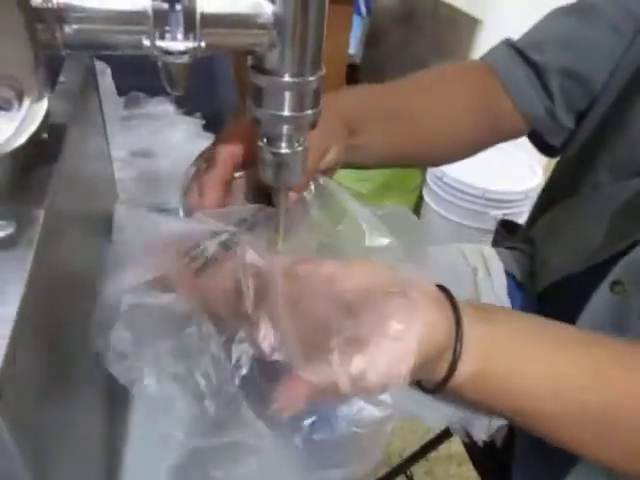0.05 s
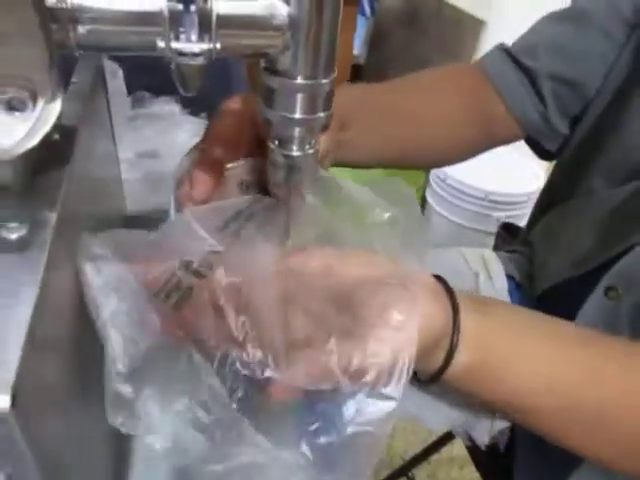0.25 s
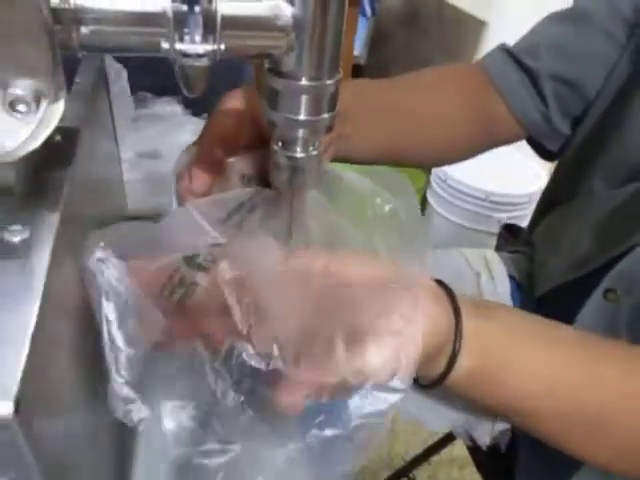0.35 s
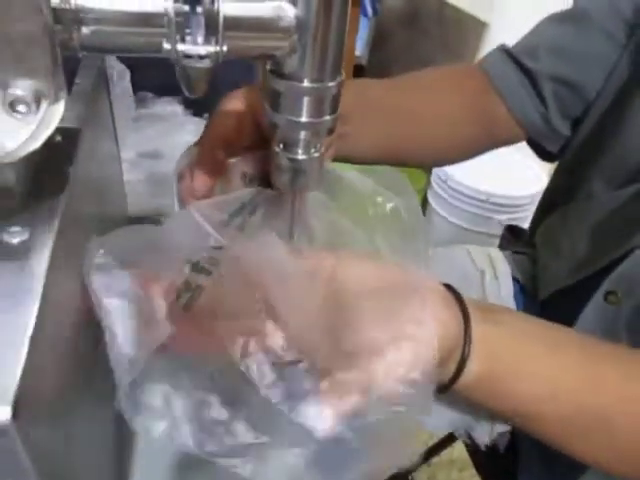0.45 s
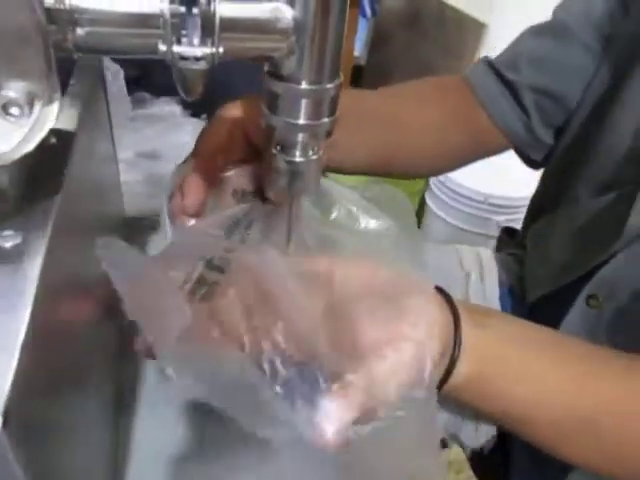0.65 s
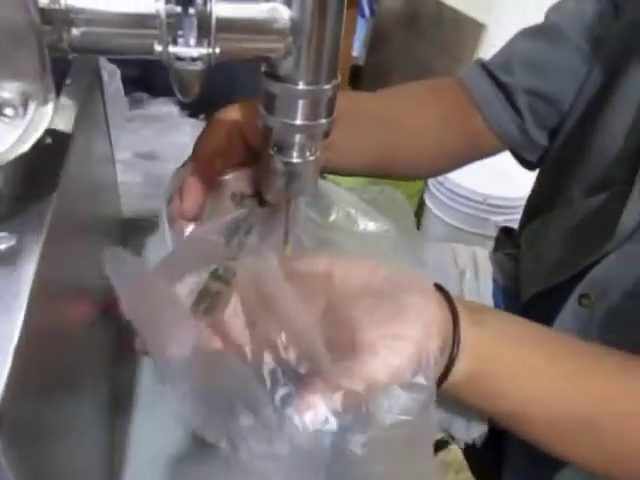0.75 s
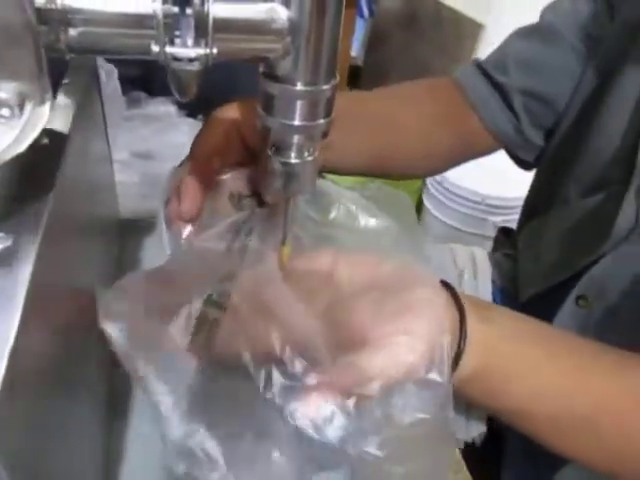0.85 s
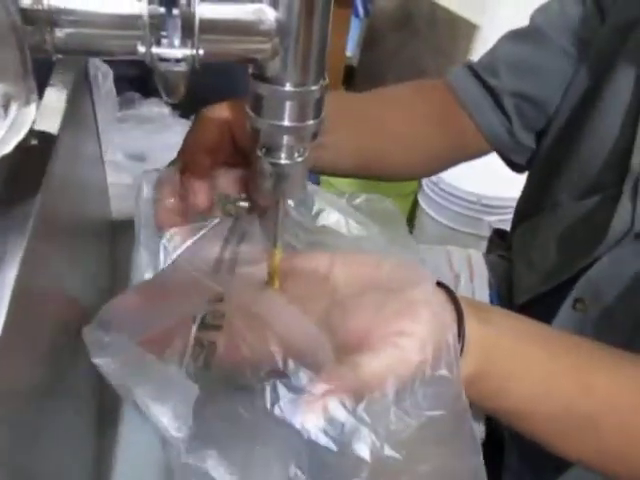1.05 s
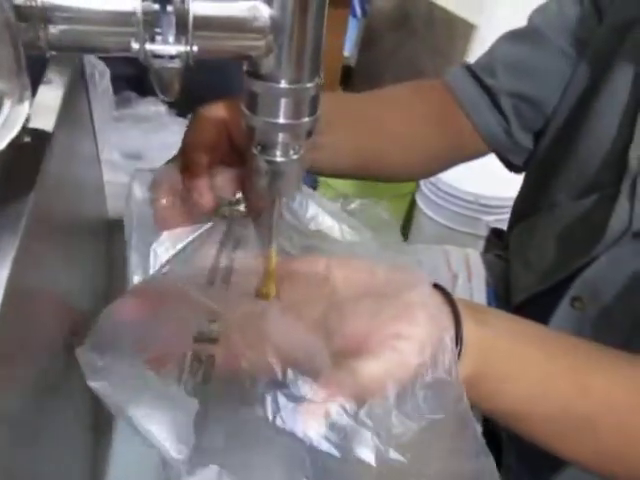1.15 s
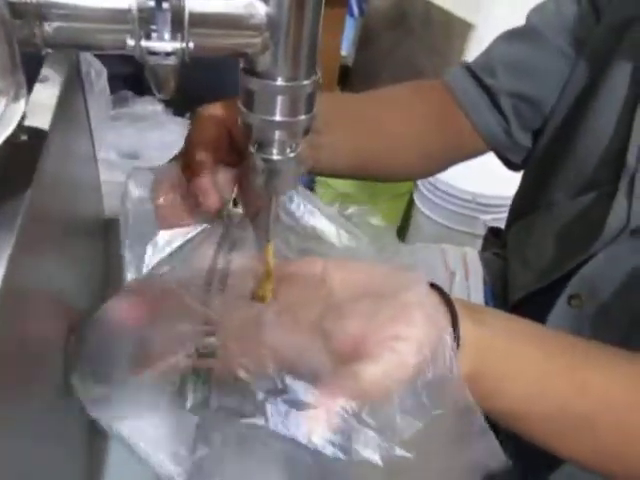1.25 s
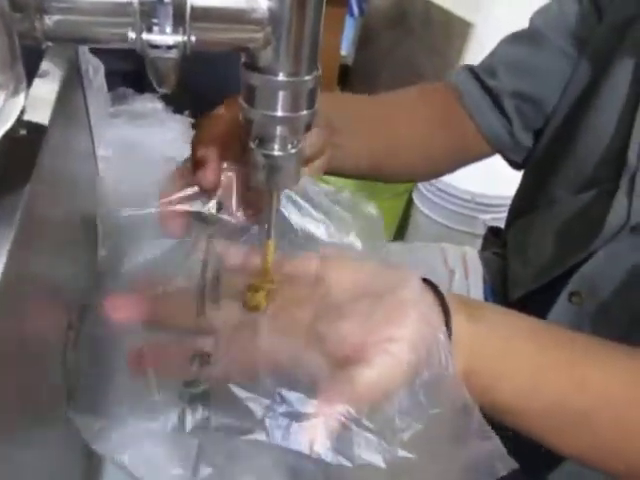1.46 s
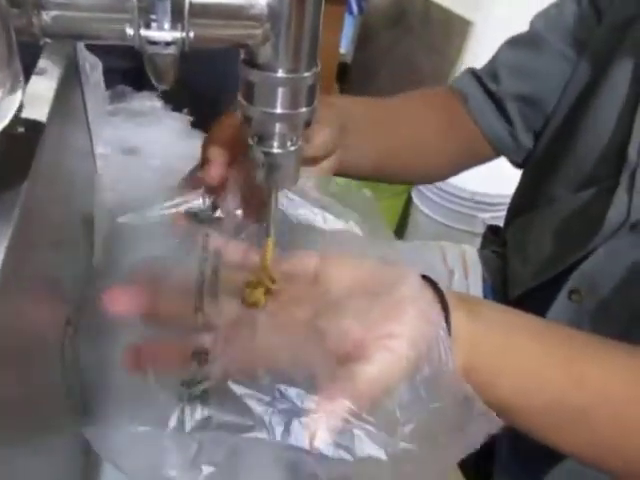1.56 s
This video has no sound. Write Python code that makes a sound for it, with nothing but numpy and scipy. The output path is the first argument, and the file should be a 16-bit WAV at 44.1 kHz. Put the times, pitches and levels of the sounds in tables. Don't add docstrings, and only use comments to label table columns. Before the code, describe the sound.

A single sharp air-piston clack and nozzle knock, followed by swelling air hiss and faint bag rustle

```python
import sys
import numpy as np
from scipy import signal
from scipy.fft import rfft, irfft
from scipy.io import wavfile
from scipy.ndimage import uniform_filter1d

SR = 44100
rng = np.random.default_rng(int(sys.argv[2]) if len(sys.argv) > 2 else 0)


def persist_wave(psi):
    counts = np.round(np.clip(psi, -1, 1) * 32767).astype(np.int16)
    wavfile.write(sys.argv[1], SR, np.atleast_2d(counts).T)


def volts_from_db(level):
    exponent = np.asarray(level, float) / 20
    return 10 ** exponent


N = 70560
T = np.arange(N) / SR


def evened(x):
    return x / np.sqrt(np.mean(x ** 2) + 1e-20)


def read(points, hz):
    f, value = np.transpose(points)
    return np.interp(np.log(hz + 1), np.log(f + 1), value)


def bumps(rows, hz):
    return sum(db * np.exp(-((hz - f) / width_hz) ** 2) for f, width_hz, db in rows)


def curve(rows, column=1):
    rows = np.array(rows)
    return np.interp(T, rows[:, 0], rows[:, column])


def noise(colour, patchy_db, flicker_db, boosts=((1, 1, 0),), size=512):
    frames, hz = 4 * N // size + 5, np.fft.rfftfreq(size, 1 / SR)
    real, imag, patch = rng.standard_normal((frames, len(hz), 3)).T
    patch = uniform_filter1d(patch, size=8, axis=0)
    patch = evened(uniform_filter1d(patch, size=10, axis=1))
    flicker = evened(uniform_filter1d(rng.standard_normal(frames), size=2))
    outside = (hz < colour[0][0] * .7) | (hz > colour[-1][0] * 1.3)
    colour_db = read(colour, hz) + bumps(boosts, hz) - 60 * outside
    gain = volts_from_db(colour_db[:, None] + patchy_db * patch + flicker_db * flicker)
    z = (real + 1j * imag) * gain
    return evened(signal.istft(z, nperseg=size, noverlap=3 * size // 4)[1][:N])


def ring(modes, start_s, db=0):
    t = np.maximum(T - start_s, 0)
    return sum(volts_from_db(db + level_db - 60 * t / t60_s) * np.sin(2 * np.pi * hz * t)
               for hz, level_db, t60_s in modes)


def bursts(rows):
    out = np.zeros(N)
    for centre_s, peak_db, hz, length_ms in rows:
        t = T - centre_s
        bell = np.exp(-(t / (length_ms / 1000)) ** 2)
        out += volts_from_db(peak_db) * bell * np.sin(2 * np.pi * hz * t)
    return out


# pitch_hz, level_db, t60_s
VALVE_MODES = [(890, 1, 0.037), (1180, -4.5, 0.028), (1340, -1.5, 0.024), (1780, -6, 0.069)]
# start_s, level_db
VALVE_TICKS = [
    (0.194, -46),
    (0.2022, -37.5),
    (0.2094, -31),
    (0.2106, -25.5),
    (0.2137, -33.5),
    (0.2188, -35.5),
    (.283, -31),
]
# centre_s, peak_db, pitch_hz, length_ms
SLAMS = [
    (.2253, -19, 7600, .3),
    (.2265, 1, 7900, .4),
    (.2266, -16, 13000, .5),
    (.2284, -9, 8200, .5),
    (.2305, -14, 8000, .8),
    (.231, -18, 3500, .8),
    (.2345, -17, 7000, .8),
]
# pitch_hz, level_db, t60_s
CYLINDER_MODES = [(1320, -27, 0.017), (1910, -17, 0.037), (3590, -23, 0.031), (6410, -20.5, 0.055),
                  (7300, -43, 0.034), (7240, -34, .05), (8800, -12, 0.021), (13000, -31, 0.0083)]
CYLINDER_START_S = .2272


def piston():
    ticks = sum(ring(VALVE_MODES, start_s, db) for start_s, db in VALVE_TICKS)
    return bursts(SLAMS) + ring(CYLINDER_MODES, CYLINDER_START_S) + ticks


# start_s, pitch_hz, length_s, rise_s
STOP = (.2283, 221, .0085, .0008)
STOP_DB = -0.5
# centre_s, peak_db, pitch_hz, length_ms
JOLTS = [(.231, -52, 39, 5.2), (.328, -31, 115, 7.8), (.232, -20.5, 660, 3.4), (.231, -23, 516, 2.3),
         (.232, -29.5, 460, 3.5), (0.21, -26.5, 1050, 3), (.2515, -18.5, 214, 5.2), (.287, -25, 255, 3.3),
         (.3005, -19.5, 290, 1.8), (0.3, -18, 230, 4), (.356, -21, 208, 20), (.3805, -18, 231, 3.4),
         (0.46, -33, 250, 0.94), (.4465, -27, 270, 2.3)]
# centre_s, peak_db, pitch_hz, length_ms
LATE_KNOCKS = [
    (.70, -44, 460, 7.4),
    (.697, -46, 637, 3.1),
    (1.59, -49.5, 980, 8),
    (1.588, -45, 3570, 4),
    (1.592, -48, 2900, 4),
]
# pitch_hz, level_db, t60_s
FRAME_MODES = [(157, -27, 0.33), (203, -28, 0.38), (236.3, -29.5, 0.67), (287.3, -33.5, 0.86),
               (379, -33.5, 0.2), (421, -41, 0.66)]
# pitch_hz, level_db, t60_s
NOZZLE_FRAME_MODES = [(207, -31, 1), (615, -32, 0.24), (419, -38, 0.59)]


def frame():
    start_s, hz, length_s, rise_s = STOP
    t = np.maximum(T - start_s, 0)
    envelope = np.exp(-(t / length_s) ** 4) * (1 - np.exp(-t / rise_s))
    stop = volts_from_db(STOP_DB) * np.sin(2 * np.pi * hz * t) * envelope
    hum = ring(FRAME_MODES, start_s + length_s) + ring(NOZZLE_FRAME_MODES, KNOCKS[-1][0])
    out = stop + bursts(JOLTS + LATE_KNOCKS) + hum
    return signal.sosfiltfilt(signal.butter(2, 30, "high", fs=SR, output="sos"), out)


# freq_hz, level_db
EXHAUST_COLOUR = [(290, -46), (500, 1.5), (1030, -7), (1180, 0), (2360, -2.5), (4660, -10), (6800, -6),
                  (10200, -10.5), (16000, -26)]
# start_s, low_db, bright_db, rise_s, t60_s
PUFFS = [
    (0.2088, -31.5, -41, 0.00087, 0.49),
    (0.2241, -16, -10, 0.0016, 0.04),
    (0.228, -33, -25, 0.0044, 0.51),
    (0.3218, -18.5, -21, 0.00062, 0.028),
    (0.377, -35.5, -28, 0.0016, 0.076),
    (0.384, -51, -37, 0.0054, 0.035),
    (.33, -40, -50, 0.021, 0.78),
    (0.689, -47.5, -59, 0.0021, 0.27),
]
SPLIT_HZ = 6400


def exhaust():
    hiss = noise(EXHAUST_COLOUR, patchy_db=0.43, flicker_db=1.1, size=256)
    low = signal.sosfiltfilt(signal.butter(4, SPLIT_HZ, fs=SR, output="sos"), hiss)
    bright = hiss - low
    out = np.zeros(N)
    for start_s, low_db, bright_db, rise_s, t60_s in PUFFS:
        t = np.maximum(T - start_s, 0)
        envelope = volts_from_db(-60 * t / t60_s) * np.minimum(t / rise_s, 1)
        out += envelope * (volts_from_db(low_db) * low + volts_from_db(bright_db) * bright)
    return out


# start_s, level_db
KNOCKS = [
    (.3211, -15),
    (.3223, -15),
    (.3230, -19),
    (.3245, -23),
    (.3287, -26),
]
# pitch_hz, level_db, t60_s
NOZZLE_MODES = [(553, -9, 0.035), (896, -8.5, 0.015), (1240, -8.5, .016), (1430, -0.5, 0.016),
                (2620, -2, 0.013), (3210, -10, 0.0066), (6280, -8, 0.018), (8000, -7, 0.012),
                (11000, -16, 0.0091), (13800, -28, 0.0087)]
# centre_s, peak_db, pitch_hz, length_ms
CRACKS = [
    (.3214, -9, 3000, .12),
    (.3225, -11, 4000, .12),
    (.3232, -11, 4000, .12),
    (.3247, -14, 3000, .15),
]


def nozzle():
    out = np.zeros(N)
    for start_s, db in KNOCKS:
        modes = [(hz * rng.uniform(0.95, 1.01), level_db, t60_s) for hz, level_db, t60_s in NOZZLE_MODES]
        out += ring(modes, start_s, db)
    out = signal.sosfilt(signal.butter(2, 300, "high", fs=SR, output="sos"), out)
    return out + bursts(CRACKS)


# time_s, pitch_hz, fundamental_db, second_harmonic_db, third_harmonic_db
SQUEAK = [
    (.294, 4830, -47, -62, -80),
    (.299, 4780, -28.5, -44, -62),
    (.306, 4720, -27, -38, -52),
    (.314, 4710, -22, -24.5, -46),
    (.3215, 4710, -31.5, -16, -42),
    (.3265, 4630, -28, -28.5, -48),
    (.332, 4600, -34, -34, -44),
    (.341, 4700, -45, -46, -70),
    (.372, 4730, -64, -46, -80),
]
WOBBLE_HZ, ROUGH_DB = 25.2, 2


def squeak():
    wobble, rough = (evened(uniform_filter1d(v, size=90)) for v in rng.standard_normal((2, N)))
    loose = np.clip((T - KNOCKS[0][0]) / .003, .05, 1)
    phase = 2 * np.pi * np.cumsum(curve(SQUEAK) + WOBBLE_HZ * loose * wobble) / SR
    gate = (T > SQUEAK[0][0]) * (T < SQUEAK[-1][0])
    tone = sum(volts_from_db(curve(SQUEAK, column=k + 1)) * np.sin(k * phase) for k in range(1, 4))
    return np.sqrt(2) * gate * volts_from_db(ROUGH_DB * loose * rough) * tone


# freq_hz, level_db
BAG_COLOUR = [(590, -39), (1000, -9.5), (1350, -2.5), (4170, -6), (4790, -17), (6400, -3), (11200, -4.5),
              (16000, -13)]
# time_s, rustle_db
HANDLING = [(0, -45), (.05, -43.5), (.09, -49), (.19, -50), (.5, -56), (.9, -58), (.93, -56), (.97, -55),
            (1.28, -55.5), (1.38, -47), (1.45, -56), (1.6, -51)]
# centre_s, peak_db, pitch_hz, length_ms
SNAPS = [(.0065, -27, 8600, 0.31), (.0145, -38, 9000, .6), (.024, -33, 12300, 0.87), (.032, -33, 8000, 3.1),
         (.050, -35, 11000, 1.4), (.068, -45, 3700, 1), (.072, -35, 9900, 0.68), (0.072, -36.5, 2470, 1.2),
         (.077, -48, 7000, 0.92), (.097, -42, 8000, 1.2), (.107, -40, 8900, .8), (.126, -38, 7700, 2),
         (.134, -41, 8000, 1.1), (0.143, -41, 12100, .9), (.171, -44, 9500, .8), (0.1757, -37, 8700, 1),
         (.188, -56, 9000, 1), (.197, -26.5, 9200, 0.96), (.263, -31, 10200, .8), (.268, -22, 6600, .8),
         (0.546, -42.5, 11000, 1.2), (.765, -39, 13000, .7), (.843, -44, 12000, 1), (.866, -47, 13000, .7),
         (.935, -38, 10100, 1), (.988, -41, 11000, .8), (1.114, -35.5, 9000, 1), (1.171, -39, 6000, 1),
         (1.232, -44, 9000, 1), (1.292, -38, 8300, 1), (1.317, -35, 9500, 1.1), (1.335, -39, 11000, 1),
         (1.367, -34, 8500, .8), (1.3665, -38, 12500, .8), (1.366, -33, 2500, 1.2), (1.312, -35, 8000, 1),
         (1.28, -43, 11200, 1), (1.386, -38, 11000, 1), (1.421, -40, 9500, 1), (1.589, -34, 3370, 7.7)]
GRAINS_PER_S, SNAP_Q = 900, 2.1


def bag():
    grain_db = 3.0 * np.minimum(rng.exponential(1, N), 4)
    grains = volts_from_db(grain_db) * (rng.random(N) < GRAINS_PER_S / SR)
    lumps = evened(2.0 + signal.lfilter([1], [1, -.97], grains))
    out = volts_from_db(curve(HANDLING)) * lumps * noise(BAG_COLOUR, patchy_db=0.9, flicker_db=1.05, size=256)
    hiss = rng.standard_normal(N)
    for centre_s, peak_db, hz, length_ms in SNAPS:
        burst = hiss * np.exp(-((T - centre_s) * 1000 / length_ms) ** 2)
        snap = signal.filtfilt(*signal.iirpeak(hz, SNAP_Q, SR), burst)
        out += volts_from_db(peak_db) * snap / abs(snap).max()
    return out


# freq_hz, level_db
AIR_COLOUR = [(470, -38), (800, -16.5), (1920, 0.5), (3690, 0), (4800, -4.5), (5650, -2.5), (6910, -3.5),
              (12300, -18), (16000, -20)]
# freq_hz, width_hz, boost_db
PIPE = [(3700, 140, 1.6), (5570, 630, 4.85), (12300, 260, 11), (3797, 57, 8.2), (3490, 23, 6.1),
        (5285, 32, 10.6), (5530, 14, 9), (5610, 20, 11.6), (5890, 40, 7.4), (8040, 81, 6.7),
        (13100, 110, 3)]
# time_s, level_db
FLOW = [(0, -50.5), (.18, -57), (.45, -51.5), (.62, -48), (.75, -45.5), (1.1, -43.5), (1.5, -43),
        (1.6, -42.5)]


def dosing_air():
    hiss = noise(AIR_COLOUR, patchy_db=1.0, flicker_db=0.13, boosts=PIPE, size=2048)
    return volts_from_db(curve(FLOW) + 0.5) * hiss


# freq_hz, level_db
RUMBLE_COLOUR = [(20, -13), (36, -9.5), (52, 0.5), (110, -9.5), (215, -13), (400, -21), (750, -25),
                 (1300, -35)]
RUMBLE_DB = -46.5
# time_s, level_db
SWELL = [(0, 3.5), (.15, 5), (.45, -4.5), (.8, 0.5), (.92, 0), (1.6, 1)]


def workshop_rumble():
    return volts_from_db(RUMBLE_DB + curve(SWELL)) * noise(RUMBLE_COLOUR, patchy_db=0.76, flicker_db=0.85, size=2048)


# freq_hz, t60_s
ROOM_DECAY = [(100, 1), (400, 0.93), (1500, 0.41), (5000, 0.18), (14000, 0.1)]
ROOM_DB = -19.5


def room(x):
    taps, at = np.zeros(SR // 2), np.arange(200, SR // 2 - 20, 20)
    taps[at + rng.integers(0, 20, len(at))] = rng.choice([-1., 1.], len(at))
    hz, t, z = signal.stft(taps, SR, nperseg=256)
    decay = volts_from_db(-60 * t / read(ROOM_DECAY, hz)[:, None])
    tail = signal.istft(z * decay, SR, nperseg=256)[1]
    return signal.fftconvolve(x, tail / np.linalg.norm(tail))[:N]


def scene():
    shot = piston() + exhaust()
    low = frame()
    close = squeak() + nozzle()
    echoes = volts_from_db(ROOM_DB) * room(shot + 0.4 * low + .5 * close)
    steady = workshop_rumble() + dosing_air()
    return (shot + low + close + echoes + steady + bag())[None]


def roll_off(x):
    return signal.sosfilt(signal.butter(12, 16160, fs=SR, output="sos"), x)


# freq_hz, width_hz, depth_db
HOUSING_DIPS = [(767, 97, -7), (4880, 434, -7), (4800, 65, -5.5)]
EDGE_HZ = 15700


def record(dry):
    hz = np.fft.rfftfreq(N, 1 / SR)
    edge_db = -50 * np.clip((hz - EDGE_HZ) / 110, 0, 1)
    overloaded = np.clip(dry, -1.1, 1.1)
    x = irfft(rfft(overloaded) * volts_from_db(bumps(HOUSING_DIPS, hz) + edge_db), N)
    return roll_off(np.clip(x, -.97, .97))


dry = scene()
out = record(dry)
persist_wave(out)
```